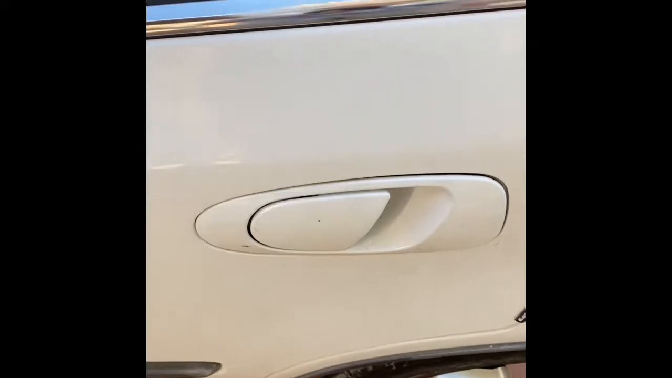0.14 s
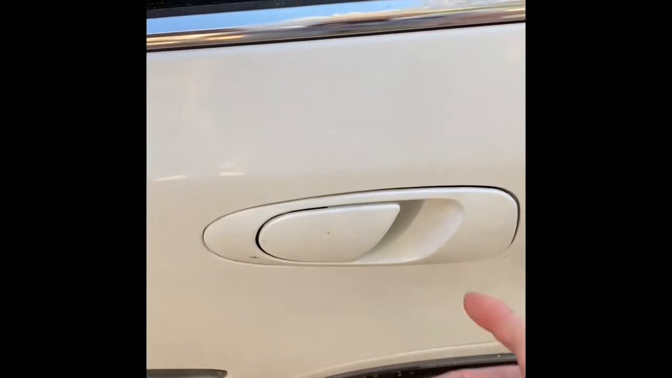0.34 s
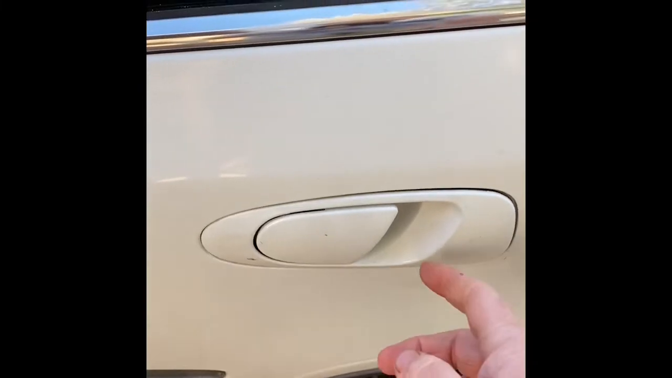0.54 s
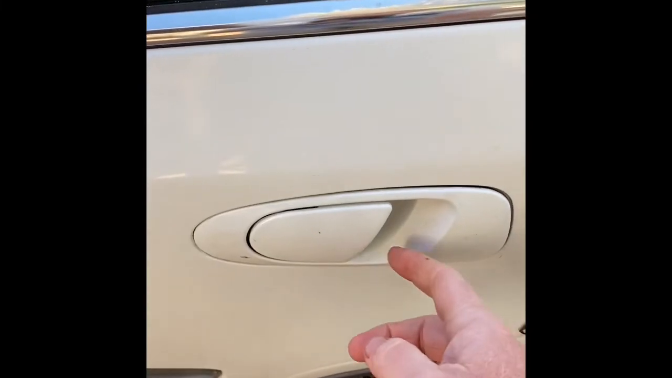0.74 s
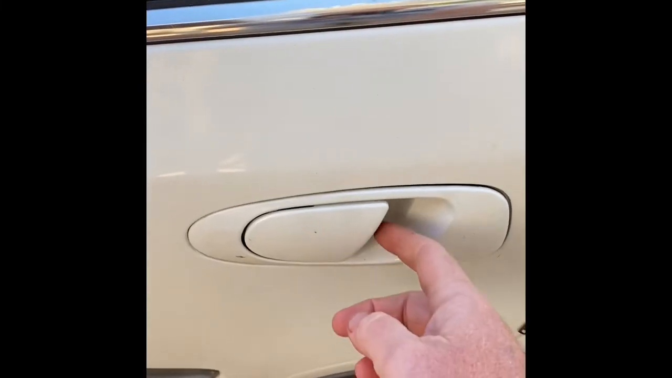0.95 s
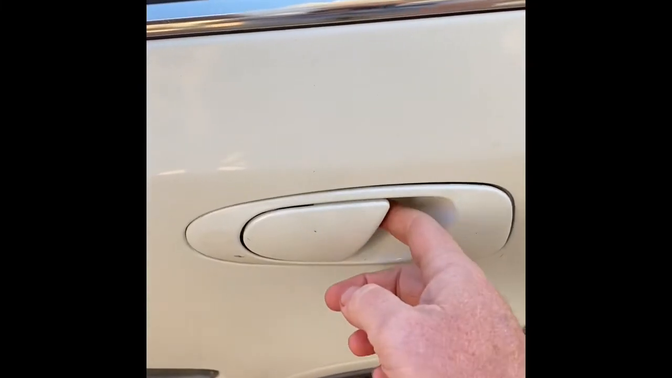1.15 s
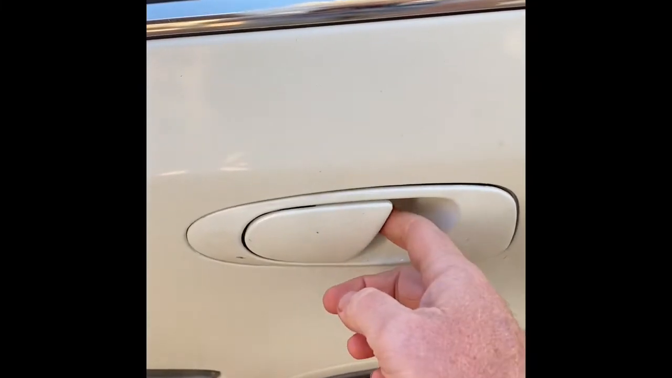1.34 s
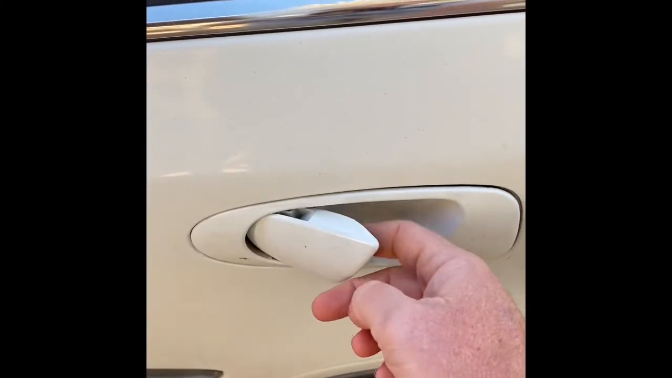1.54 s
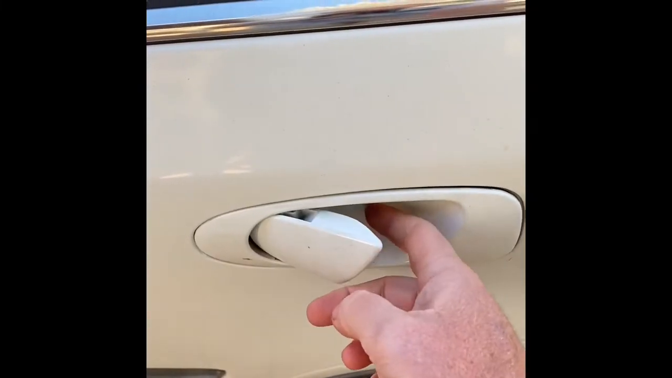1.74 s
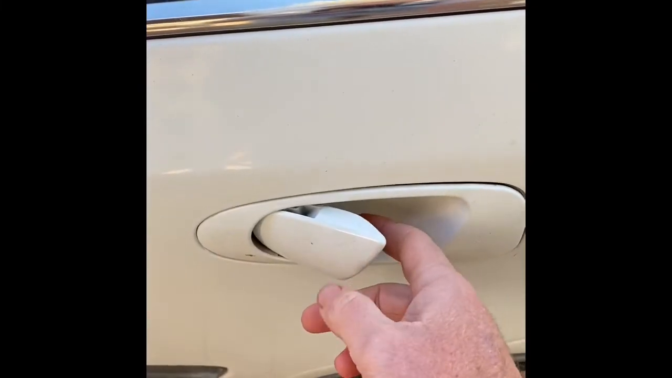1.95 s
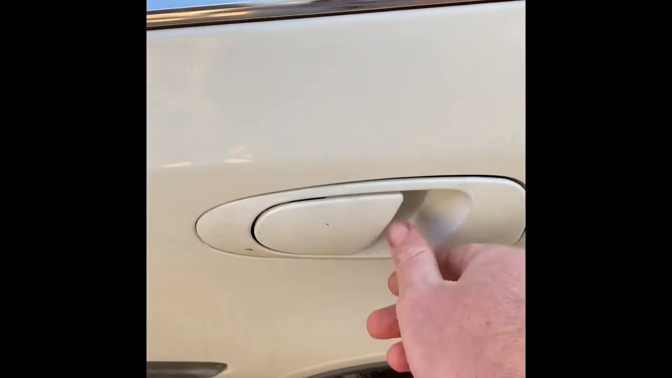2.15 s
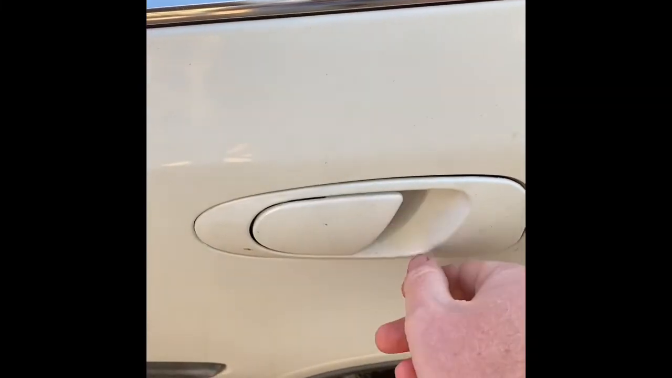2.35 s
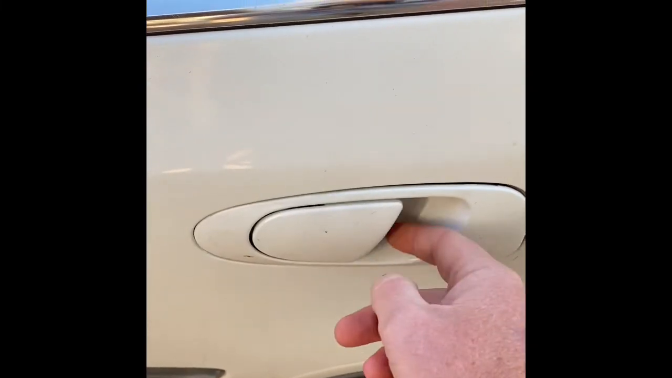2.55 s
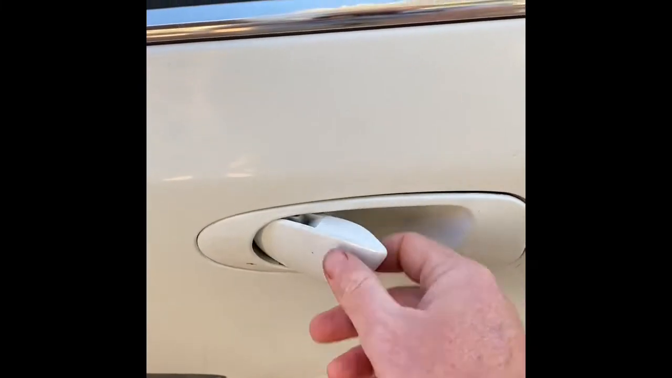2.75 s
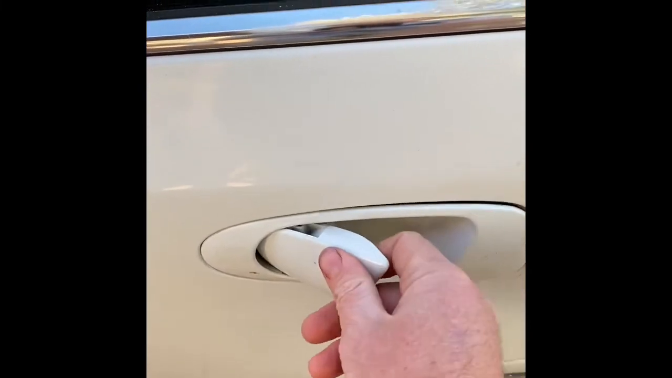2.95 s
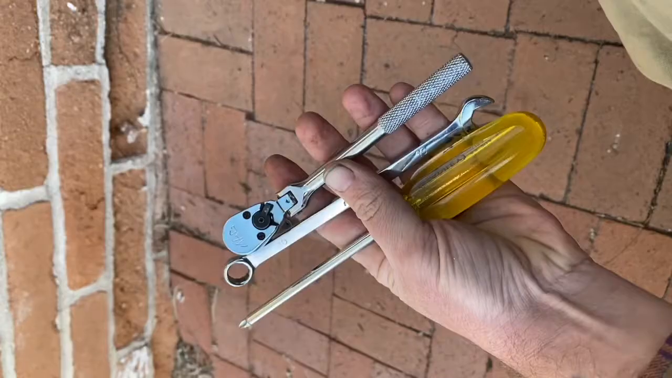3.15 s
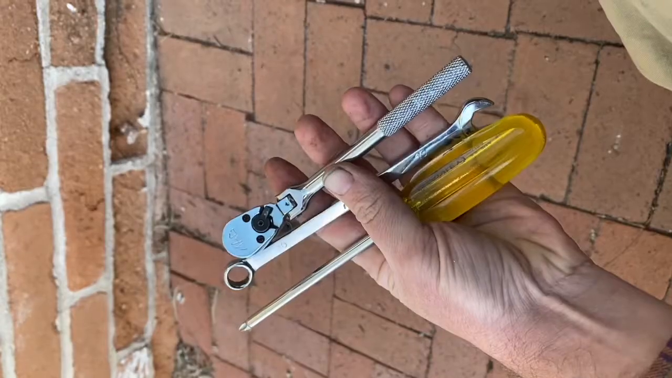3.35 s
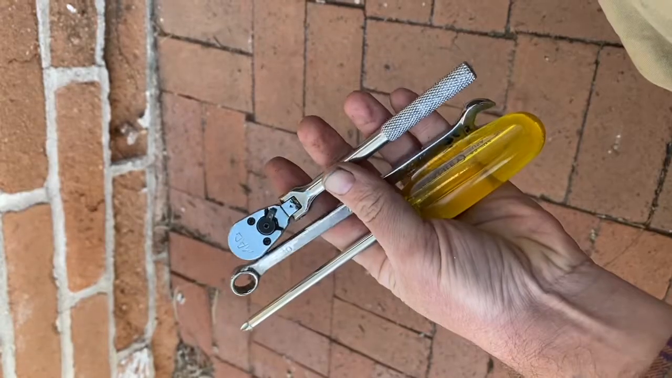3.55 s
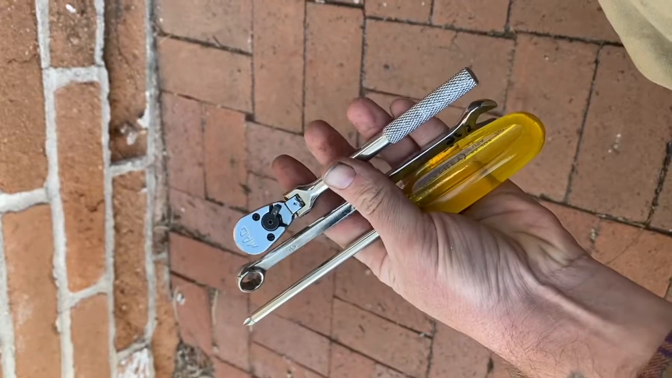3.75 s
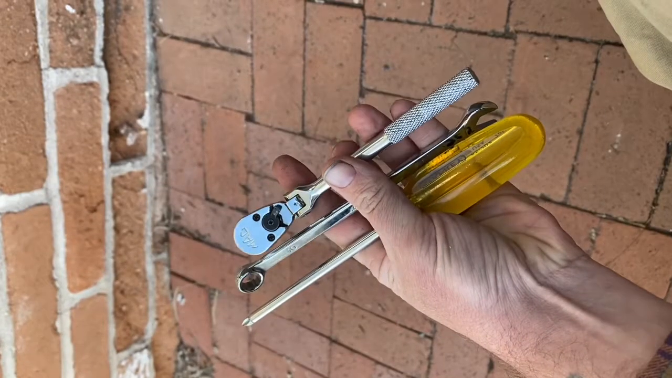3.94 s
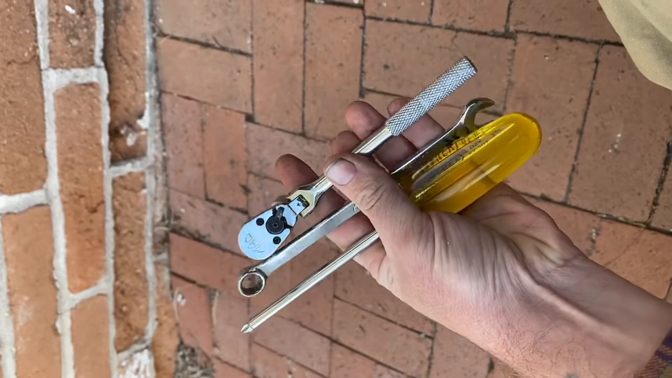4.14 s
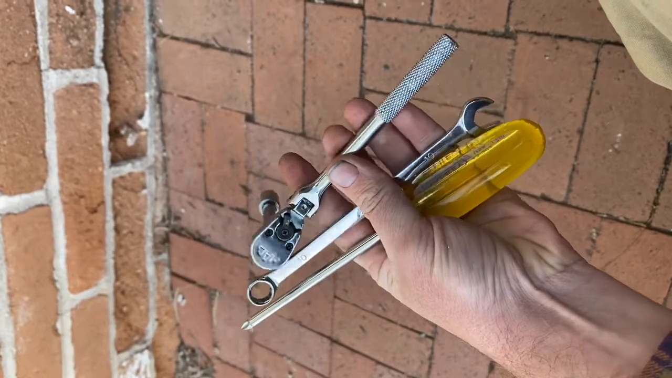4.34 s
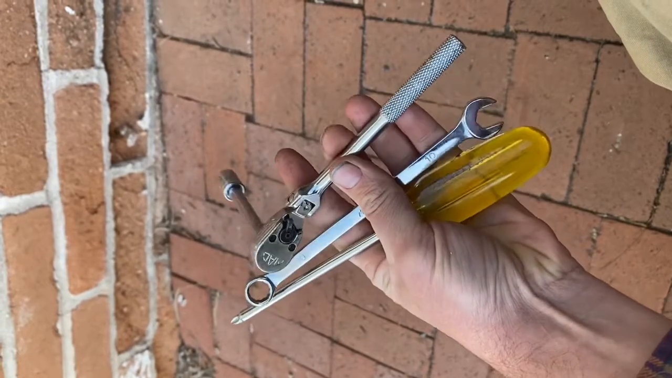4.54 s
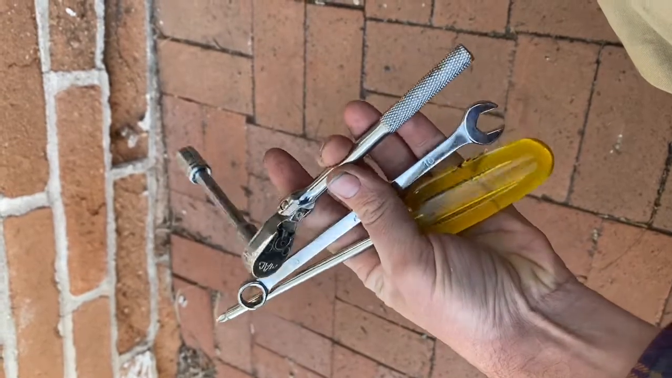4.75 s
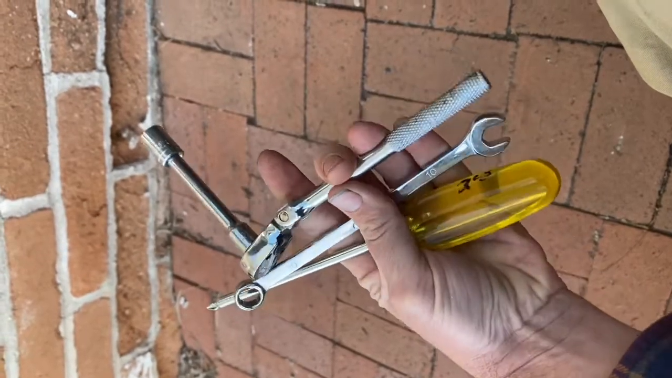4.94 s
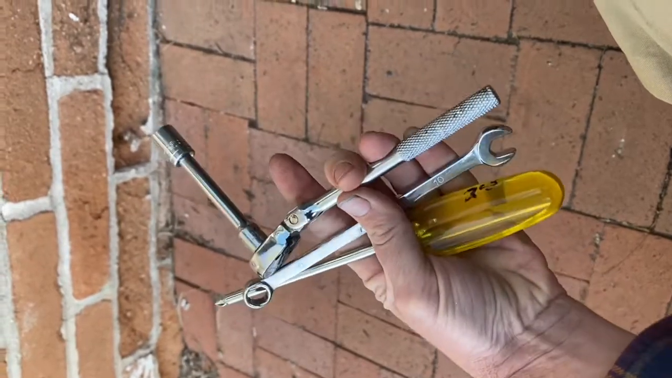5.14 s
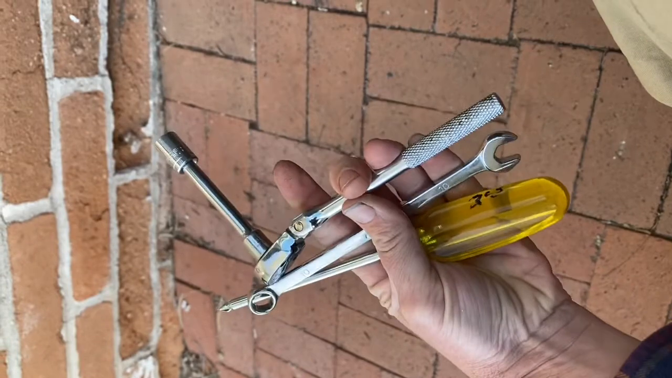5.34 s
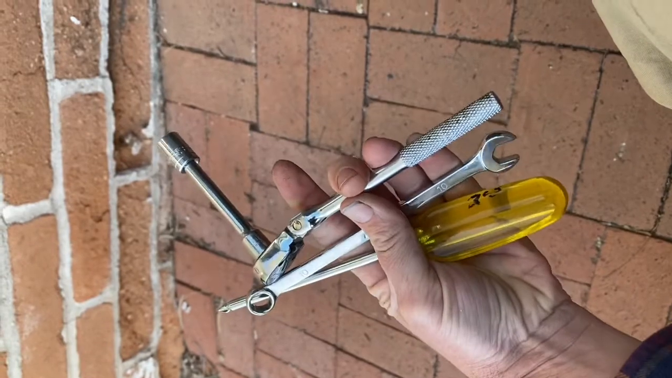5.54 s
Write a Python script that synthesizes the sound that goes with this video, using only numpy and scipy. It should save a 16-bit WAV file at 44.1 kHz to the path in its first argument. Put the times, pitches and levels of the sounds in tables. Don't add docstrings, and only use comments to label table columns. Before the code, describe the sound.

A plastic car door handle is pulled and dropped with loud hollow clacks amid fluttering wind rumble, then hand tools tick faintly in a quiet yard.

```python
import sys
import numpy as np
from scipy import signal
from scipy.fft import rfft, irfft, next_fast_len
from scipy.io import wavfile
from scipy.ndimage import uniform_filter1d

SR = 44100
rng = np.random.default_rng(int(sys.argv[2]) if len(sys.argv) > 2 else 0)


def elevation(decibels):
    levels = np.asarray(decibels, float)
    return 10 ** (levels / 20)


def int16_out(signal):
    q = np.round(np.clip(np.atleast_2d(signal).T, -1, 1) * 32767)
    wavfile.write(sys.argv[1], SR, q.astype(np.int16))


N = 250929

CHANGE_S, FADE_OUT_S, FADE_IN_S = 3.1, 0.017, 0.035
PORT_EDGE_HZ = 16100

# [f/Hz, phase/rad]
DOOR_LEAD = [(0, 0), (1000, -.3), (2300, .8), (4000, .3), (5500, .9), (7300, 3.1), (13300, 9.4),
             (16500, 13)]
YARD_LEAD = [(0, 0), (2000, 0), (3000, .8), (7000, 0), (10400, -6.2), (11500, -6.4), (15000, -12.5),
             (16500, -13)]
# [f/Hz, likeness/1]
FAR_LIKENESS = [(60, .85), (300, .8), (800, .25), (2500, .5), (5500, .45), (6800, .99), (16000, .99)]
NEAR_LIKENESS = [(60, .97), (900, .87), (2500, .92), (6500, .99), (16000, .97)]
# [f/Hz, level/dB]
NEAR_BALANCE = [(300, -.5), (650, -5.5), (1300, -3.5), (2300, 0)]

# [f/Hz, level per Hz/dB]
DOOR_AIR = [(30, 0.5), (800, -4.5), (2500, -25), (6500, -38.5), (9000, -41.5), (13000, -45), (15500, -50.5),
            (15900, -75)]
YARD_AIR = [(100, 1.5), (300, -16), (800, -9), (2000, -28.5), (4000, -35.5), (13000, -38.5), (15500, -35),
            (15900, -75)]
AIR_OFFSET_DB = 7.5
# (level/dB, top relative to it/dB)
DOOR_CALM_DB, YARD_CALM_DB = (-66.5, -20.5), (-66, -4.5)
# [middle t/s, half length/s, level/dB, top
# relative level/dB]
DOOR_SWELLS = [
    (0, 0.22, -65, 10),
    (0.557, 0.97, -69, 1),
    (1.3, 0.43, -68.5, -6),
    (2.003, 0.19, -71, -13.5),
    (2.168, 0.07, -64.5, -19),
    (2.458, 0.51, -63.5, -4),
    (2.799, 0.28, -60, 0.5),
]
YARD_SWELLS = [
    (3.45, 0.55, -78, 0),
    (4.149, 0.11, -70, 2),
    (4.7, 0.99, -69, -10),
    (5.6, 0.25, -65.5, 0.5),
]
SWELL_EDGE_DB, SWELL_POWER = -10, 2.5

# [t/s, length/s, f/Hz, level/dB]
HUMS = [
    (.4, .12, 365, -63),
    (.65, .28, 355, -62),
    (3.12, .9, 188, -65),
    (4.38, .2, 2100, -80),
]
# [t/s, length/s, f/Hz, level/dB]
RUSTLES = [
    (0, 0.37, 2170, -66.5),
    (0, 0.29, 4570, -71),
    (.637, 0.39, 2546, -65.5),
    (.642, 0.24, 3470, -70.5),
    (.642, 0.26, 4520, -71.5),
    (4.79, 0.21, 3880, -72.5),
    (4.78, 0.19, 2613, -71),
    (4.8, 0.24, 1810, -70.5),
    (5.6, .5, 1687, -68),
    (5.62, 0.35, 2480, -72),
]
HUM_WIDTH_SHARE, RUSTLE_WIDTH_SHARE, RUSTLE_FADE_DB = .04, .15, -18
# [middle t/s, half length/s, level/dB]
ENGINE_ORDERS = [
    [(4.45, 0.26, -65), (5.15, 0.207, -68)],
    [(4.946, 0.39, -69)],
    [(4.922, 0.19, -70)],
]
ENGINE_S, ENGINE_HZ, ENGINE_HZ_PER_S = 4.2, 163.3, 15

# [t/s, buzz level/dB, whistle level/dB, whistle delay/s, whistle t60/s]
CHIRPS = [
    (0.329, -70, -67.5, 0.096, 1),
    (1.05, -70, -72, 0.099, 1),
]
BUZZ_HZ, BUZZ_WIDTH_HZ, WHISTLE_HZ, OVERTONE_DB = 9200, 1500, 5750, -9
FIRST_PULSE, SECOND_PULSE = (0.051, 0.046, -8), (0.21, 0.027, 0.0)  # (delay/s, half length/s, level/dB)
TAIL_DB, TAIL_DB_PER_S, CHIRP_S, WHISTLE_SAG_PER_S = -5.5, -24, 0.595, .08

# [f/Hz, level per Hz/dB]
RUMBLE = [(15, -42.5), (30, -20), (50, 22), (75, 21.5), (110, 16), (150, -4.5), (220, -50)]
BUFFET = [(80, -16.5), (130, 3), (170, 1.5), (250, -4), (400, -15.5), (600, -21), (900, -46.5), (1500, -82)]
# [t/s, level/dB]
BREEZE = [(0, -55.5), (.18, -61), (.7, -52), (1.1, -45), (1.85, -45), (2.2, -40.5), (3.08, -41.5),
          (3.14, -69), (4.2, -53), (5.2, -55), (5.35, -64), (5.69, -60.5)]
BUFFET_DB, BUFFET_GROWTH, YARD_BUFFET_DB = -40, 1.6, -55
# [middle t/s, half length/s, rumble level/dB,
# buffet level/dB]
GUSTS = [(.03, 0.046, -43.5, -61), (.76, 0.03, -40, -43), (1.15, 0.036, -36, -40.5),
         (1.27, 0.022, -37.5, -36), (1.365, 0.033, -50, -28.5), (1.48, 0.056, -33, -41),
         (1.6, 0.056, -39, -38), (1.76, 0.069, -38.5, -30.5), (1.9, 0.057, -36, -29.5),
         (2.04, 0.065, -32, -29), (2.13, 0.092, -37.5, -38), (2.38, 0.063, -29.5, -31.5),
         (2.48, 0.036, -33, -32), (2.61, 0.046, -42, -27), (2.79, 0.046, -33.5, -47),
         (2.93, 0.092, -32.5, -37), (3.04, 0.034, -30.5, -26), (3.58, 0.087, -43, -57),
         (3.88, 0.071, -49, -60), (4.28, 0.061, -47, -60.5), (4.72, 0.021, -41, -52.5),
         (5.05, 0.04, -42.5, -54)]
# [t/s, peak level/dB, first f/Hz]
EDDIES = [(0.588, -41, 780), (1.085, -26, 846), (1.136, -33, 800), (1.161, -46, 700), (1.21, -44, 700),
          (1.267, -28, 1117), (1.444, -23, 900), (1.508, -51, 800), (1.567, -28.5, 1080), (1.583, -28, 860),
          (1.61, -30, 1054), (1.656, -33, 900), (1.69, -25, 1030), (1.702, -29.5, 800),
          (1.723, -25.5, 1144), (1.755, -23.5, 1150), (1.785, -29, 797), (1.795, -29.5, 924),
          (1.851, -37.5, 850), (1.865, -20.5, 893), (1.897, -25.5, 1226), (1.919, -27.5, 865),
          (1.931, -23.5, 804), (1.977, -25.5, 1077), (2.229, -38, 730), (2.253, -31.5, 802),
          (2.27, -39, 750), (2.289, -31.5, 970), (2.306, -35.5, 1150), (2.325, -21.5, 1000),
          (2.344, -39, 810), (2.378, -29.5, 922), (2.41, -29, 890), (2.447, -25.5, 1013),
          (2.459, -24.5, 1150), (2.482, -22, 1179), (2.504, -36.5, 807), (2.698, -33, 830),
          (2.72, -24, 873), (2.75, -27.5, 830), (2.793, -35, 775), (2.878, -26.5, 845), (2.89, -24, 880),
          (2.935, -38, 750), (3.009, -29, 887), (3.029, -24.5, 916)]

# [f/Hz, level/dB, t60/s]
BAR_MODES = [(2530, -16.5, 0.047), (3300, -13, 0.086), (3824, 1, 0.037), (3880, -18, 0.018),
             (5040, -20.5, 0.025), (6470, -7.5, 0.049), (6960, -0.5, 0.038), (9330, -10, 0.076),
             (11150, -4.5, 0.069), (13820, -19, 0.05)]
SPANNER_MODES = [(2690, -11.5, 0.039), (3180, -9.5, 0.056), (3750, -15, 0.075), (4730, -17, 0.046),
                 (6890, 4.5, 0.049), (10310, -11, .025), (11050, -4, 0.056)]
GRIP_MODES = [(4650, 6.5, 0.0087), (5400, 5, 0.0079), (6430, 9.5, 0.0071), (11060, -17.5, 0.0044),
              (14000, -17, 0.0021)]
# [f/Hz, level per Hz/dB]
SCUFF = [(1500, -24.5), (2500, -2), (4000, 1), (8000, -8), (16000, -1)]
# [t/s, peak level/dB, pitch factor for size of part/1]
BAR_TICKS = [
    (3.5025, -58, 1.01),
    (3.9822, -27.5, 1.027),
    (4.8076, -64, 1.01),
]
SPANNER_TICKS = [
    (3.4462, -64, 1.14),
    (4.3117, -32.5, 1.046),
    (5.5768, -55, 0.99),
]
GRIP_TICKS = [
    (3.3294, -54.5, 0.48),
    (3.942, -36.5, 0.92),
    (3.9442, -31, 1),
    (3.962, -38, 0.93),
    (4.3686, -47, 0.43),
    (4.4419, -51.5, 0.52),
    (4.7417, -42, 0.98),
    (4.7445, -43.5, 0.91),
    (5.5424, -51, 1.47),
    (5.5775, -48, 1.25),
]

# [f/Hz, level/dB, t60/s]
PULL_MODES = [(356, -11, .2), (544.4, -9.5, 0.23), (623, -0.5, 0.22), (780, -0.5, 0.18), (868, 4.5, 0.073),
              (998, -7.5, 0.23), (1076, -4.5, 0.19), (1239, -7.5, 0.091), (1701, -11, .11),
              (1872, -5.5, 0.076), (1980, -13.5, 0.1), (2253, -10, .064), (2625, -15.5, 0.065),
              (3230, -16.5, 0.13)]
DROP_MODES = [(381, 2.5, 0.12), (548, -4.5, .15), (621, 3.5, 0.25), (842.6, -8, .11), (1010, -9, 0.11),
              (1125, -9.5, .11), (1239, -19, 0.084), (1635, -13, 0.097), (2130, -18, .1),
              (2290, -14.5, 0.099), (2540, -22.5, .07), (3252, -25, .11), (3585, -25, .09)]
LATCH_MODES = [(524, -9.5, 0.096), (607, -1, .15), (700, -3, 0.2), (840, 2, 0.065), (992, -7.5, 0.26),
               (1122, -13, 0.2), (1500, -6, .06), (1586, -1, .1), (1822, -14.5, 0.13), (2030, -17.5, .12),
               (2202, -4.5, 0.055), (2607, -21.5, 0.11), (3147, -21, .088)]
SEAT_MODES = [(358, -5.5, 0.12), (529, -10, 0.092), (609, 4, 0.059), (883, -1, 0.066), (1003, -1, 0.12),
              (1450, -4, 0.068), (1633, -6.5, 0.11), (1913, -8.5, .1), (2405, -26, 0.13), (3210, -26, 0.12)]
SPRING_MODES = [(900, -11, 0.1), (1753, -3, 0.11), (2220, -6.5, .04), (5250, -14, 0.053), (5560, -23, .07),
                (11400, -19.5, 0.026)]
# [f/Hz, level/dB, t60/s]
CRACK_MODES = [(893, 1, 0.016), (1150, -6.5, 0.016), (2000, -3, 0.032), (2620, -5, 0.014),
               (3050, -5.5, 0.015), (5270, -9.5, 0.013), (6440, 2.5, 0.0078), (10340, -13, 0.00495),
               (14000, -21.5, .008)]
SLAP_MODES = [(1031, 2, 0.016), (1910, 6, 0.009), (2650, -4, 0.013), (3300, 0.5, 0.0086),
              (4490, -11, 0.018), (5640, -8, 0.01), (9500, -13, 0.01), (10950, -13, 0.014)]
# [f/Hz, factor on t60/1]
RATTLE = [(200, -20.5), (500, 0.5), (900, -8.5), (2000, -11.5), (3500, -24), (6000, -22.5), (11000, -29),
          (16000, -47.5)]
RATTLE_LIFE = [(200, 2.7), (800, 1.2), (2000, 0.83), (6000, 0.6), (15000, 0.09)]
# [t/s, ring level/dB, crack level/dB, rattle level/dB, rattle t60/s]
PULLS = [
    (1.319, -39, -52.5, -52, 0.67),
    (1.333, -43, -59.5, -42, 0.43),
    (1.3407, -36.5, -12, -27.5, 0.11),
    (1.342, -4.5, -3, -24, 0.16),
    (1.353, -20, -34, -33, .12),
    (1.47, -60, -44.5, -66, 0.033),
]
DROPS = [
    (2.0165, -38.5, -32.5, -30, 0.21),
    (2.0195, -24.5, 0.5, -21, 0.091),
    (2.022, -8.5, -15, -26.5, 0.12),
    (2.0258, -20.5, -3.5, -28, 0.089),
    (2.039, -8, -43, -42, 0.3),
]
LATCHES = [
    (2.5605, -27.5, -37.5, -40.5, 0.52),
    (2.572, -33, -50.5, -39, 0.13),
    (2.5797, -34.5, -11, -26, 0.12),
    (2.5812, -6.5, -1, -21, 0.13),
    (2.591, -23, -34, -29.5, 0.096),
    (2.608, -22, -46, -41, 0.091),
    (2.626, -29.5, -36, -42, 0.22),
]
SEATS = [
    (2.815, -15, -35, -35, 0.1),
    (2.828, -38, -45, -38, 0.16),
    (2.96, -61.5, -46, -53, 0.34),
    (3.022, -31, -44, -42, 0.13),
]
SPRINGS = [
    (1.99, -53, -49, -47, 0.59),
    (2.0, -32, -44, -46, 0.079),
    (2.009, -37.5, -49, -45.5, 0.18),
    (2.095, -26, -26, -32.5, 0.1),
    (2.12, -32, -46, -46, 0.22),
    (2.42, -60, -49.5, -56, 0.054),
]
PULL_TILT_DB, DROP_TILT_DB, LATCH_TILT_DB, SEAT_TILT_DB, SPRING_TILT_DB = -0.2, 1.5, -1, -4.15, 1.5


def evened(x):
    return x / np.sqrt(np.mean(x ** 2) + 1e-20)


def steadied(x, span_s):
    power = abs(uniform_filter1d(x ** 2, int(span_s * SR)))
    return x / np.sqrt(power + 0.045)


def read(points, hz):
    f, value = np.transpose(points)
    return np.interp(np.log(hz + 1), np.log(f + 1), value)


def curve(rows):
    s, *columns = np.transpose(rows)
    return [np.interp(np.arange(N) / SR, s, c) for c in columns]


def swells(rows, calm_db):
    s, half, *columns = np.transpose(rows)[:, :, None]
    t = np.arange(0, N + 64, 64) / SR
    shape_db = np.maximum(SWELL_EDGE_DB * (abs(t - s) / half) ** SWELL_POWER, -200)
    curves_db = []
    for middle_db, calm in zip(columns, calm_db):
        power = elevation(2 * (middle_db + shape_db)).sum(0)
        power = np.interp(np.arange(N) / SR, t, power)
        curves_db.append(10 * np.log10(power + elevation(2 * np.asarray(calm))))
    return curves_db


def add(mix, s, sound):
    part = mix[..., int(round(s * SR)):][..., :sound.shape[-1]]
    part += sound[..., :part.shape[-1]]


def coloured(spectrum, size=N):
    hz = np.fft.rfftfreq(size, 1 / SR)
    white = rfft(rng.standard_normal((2, size)))
    return evened(irfft(white * elevation(read(spectrum, hz)), size))


def lumps(per_s):
    hz = np.fft.rfftfreq(N, 1 / SR)
    return evened(irfft(rfft(rng.standard_normal(N)) / (1 + (hz / per_s) ** 4), N))


def whistle(hz, width):
    r = np.exp(-np.pi * max(width, 1) / SR)
    z = rng.standard_normal((2, len(hz))) + 1j * rng.standard_normal((2, len(hz)))
    drive = 3 * np.sqrt((1 - r) * (width < 30))
    z = signal.lfilter([1], [1, -2 * r, r * r], z + drive)
    carrier = np.exp(2j * np.pi * np.cumsum(hz) / SR)
    return evened((z * carrier).real)


def ring(modes, pitch=1, longest=0.9):
    t = np.arange(SR // 4) / SR
    hz, db, t60 = np.transpose(modes)[:, :, None]
    spread = np.array([.15, 1])[:, None, None]
    phase = 2 * np.pi * rng.random((2, len(modes), 1)) * spread
    decay = elevation(db - 60 * t / np.clip(t60, .002, longest))
    out = (decay * np.sin(2 * np.pi * hz * pitch * t + phase)).sum(1)
    return out / abs(out).max() * np.minimum(t / 0.00031, 1)


def ports(pair, lead, same, balance=((1, 0), (2, 0))):
    size = next_fast_len(N + 4096)
    hz = np.fft.rfftfreq(size, 1 / SR)
    c = np.clip(read(same, hz), 0, 1)
    turn = np.exp(.5j * np.interp(hz, *np.transpose(lead)))
    tip = elevation(read(balance, hz) / 2)
    main, spare = rfft(np.pad(pair, ((0, 0), (2048, size - N - 2048)), "reflect"))
    left = main * turn * tip
    right = (c * main + np.sqrt(1 - c ** 2) * spare) / turn / tip
    return irfft([left, right], size)[:, 2048:][:, :N]


def air(spectrum, rows, calm_db):
    level_db, top_db = swells(rows, calm_db)
    low = coloured(spectrum)
    top = signal.sosfilt(signal.butter(2, 3000, "high", fs=SR, output="sos"), low)
    return elevation(level_db + AIR_OFFSET_DB + 0.91 * lumps(14)) * (low + (elevation(top_db) - 1) * top)


def neighbourhood():
    out = np.zeros((2, N))
    for rows, dying in (HUMS, 0), (RUSTLES, 1):
        for s, length, hz, db in rows:
            size = int(length * SR)
            width = hz * (RUSTLE_WIDTH_SHARE if dying else HUM_WIDTH_SHARE)
            fade = elevation(np.linspace(0, RUSTLE_FADE_DB * dying, size))
            shape = fade * signal.windows.tukey(size, .15 - 0.15 * dying)
            add(out, max(s, 0), elevation(db) * shape * whistle(np.full(size, hz), width))
    return out


def engine():
    hz = ENGINE_HZ + ENGINE_HZ_PER_S * (np.arange(N) / SR - ENGINE_S)
    out = np.zeros((2, N))
    for order, rows in enumerate(ENGINE_ORDERS, 2):
        level_db, = swells(rows, [-130])
        out += elevation(level_db) * whistle(order * hz, 10)
    return out


def insect():
    t = np.arange(N) / SR
    buzz, thin, sag = np.zeros((3, N))
    for s, buzz_db, thin_db, delay, t60 in CHIRPS:
        pulses = [(s + d, half, db) for d, half, db in (FIRST_PULSE, SECOND_PULSE)]
        pulses_db, = swells(pulses, [-60])
        on = np.clip(np.minimum(t - s, s + CHIRP_S - t) / 0.082, 0, 1)
        tail = on * elevation(TAIL_DB + TAIL_DB_PER_S * abs(t - s - SECOND_PULSE[0]))
        buzz += elevation(buzz_db) * (elevation(pulses_db) + tail)
        u = np.maximum(t - s - delay, 0)
        ends = np.minimum(u / 0.033, 1) * np.clip((.18 - u) / .09, 0, 1)
        thin += elevation(thin_db - 60 * u / t60) * ends
        sag += WHISTLE_SAG_PER_S * u * (u < .2)
    buzz = buzz * elevation(2.0 * lumps(60)) * whistle(np.full(N, BUZZ_HZ), BUZZ_WIDTH_HZ)
    hz = WHISTLE_HZ * (1.005 - sag + 0.0022 * lumps(17))
    return buzz + thin * (whistle(hz, 130) + elevation(OVERTONE_DB) * whistle(2 * hz, 250))


def eddy(first_hz, slow, start):
    length = 0.0046 + .002 * slow
    u = np.arange(int(5 * length * SR)) / SR / length
    tumble = 1 + .09 * evened(uniform_filter1d(rng.standard_normal(len(u)), size=200))
    turns = np.cumsum(first_hz * (.15 + 0.67 * np.exp(-u / .7)) * tumble) / SR
    burst = np.tanh(u / 0.36) * u * np.exp(-u / 0.68)
    quarter = np.array([[0], [.25]])
    return burst * np.sin(2 * np.pi * (turns + start + quarter))


def wind():
    breeze_db, = curve(BREEZE)
    by_door = np.arange(N) < CHANGE_S * SR
    calm_db = np.where(by_door, BUFFET_DB + BUFFET_GROWTH * (breeze_db + 42.0), YARD_BUFFET_DB)
    rumble_db, buffet_db = swells(GUSTS, (breeze_db, calm_db))
    out = elevation(rumble_db + 3.8 * lumps(26.0) + 0.38) * steadied(coloured(RUMBLE), 0.037)
    out += elevation(buffet_db + 3.664 * lumps(41.4) - 2.5) * steadied(coloured(BUFFET), 0.025)
    for s, db, first_hz in EDDIES:
        slow, start = rng.random(2)
        add(out, s - .0012, elevation(db + 8.5) * eddy(first_hz, slow, start))
    return out


def tools():
    out, t = np.zeros((2, N)), np.arange(SR // 4) / SR
    kinds = [  # ticks, modes, scuff level/dB, scuff t60/s
        (BAR_TICKS, BAR_MODES, -17, .03),
        (SPANNER_TICKS, SPANNER_MODES, -17, .03),
        (GRIP_TICKS, GRIP_MODES, -23, .008)]
    for ticks, modes, scuff_db, t60 in kinds:
        for s, db, pitch in ticks:
            scuff = elevation(scuff_db - 60 * t / t60) * coloured(SCUFF, len(t))
            add(out, s, elevation(db) * (ring(modes, pitch, longest=0.073) + scuff))
    return out


def rattle(rods_hz, tilt_db, t60):
    t60 = max(t60, .02)
    hz, t, z = signal.stft(rng.standard_normal((2, SR // 4)), SR, nperseg=128, noverlap=96)
    colour_db = read(RATTLE, hz) + tilt_db * np.log2(hz / 1000 + 0.76)
    decay_db = -60 * t / (t60 * read(RATTLE_LIFE, hz))[:, None]
    z = z * elevation(colour_db[:, None] + decay_db)
    noise = signal.istft(z, SR, nperseg=128, noverlap=96)[1][:, :SR // 4]
    onset = np.minimum(np.arange(SR // 4) / (0.00022 * SR), 1)
    noise *= onset / np.sqrt(np.mean(elevation(2 * colour_db)))
    uneven_db = 8.4 * rng.standard_normal(len(rods_hz))
    rods_db = np.interp(rods_hz, hz, colour_db) + 1.1 * np.log2(rods_hz) + uneven_db
    rods = ring(np.transpose([rods_hz, rods_db, t60 * read(RATTLE_LIFE, rods_hz)]))
    return elevation(2.0) * noise + elevation(4.0) * rods


def door(blows, modes, tilt_db, edge=CRACK_MODES):
    out = np.zeros((2, N))
    rods_hz = np.geomspace(450, 7000, 40) * rng.uniform(.97, 1.03, 40)
    for s, ring_db, crack_db, rattle_db, t60 in blows:
        clack = elevation(ring_db) * ring(modes, longest=0.3) + elevation(crack_db) * ring(edge)
        add(out, s, clack + elevation(rattle_db) * rattle(rods_hz, tilt_db, t60))
    return out


def handle():
    out = door(PULLS, PULL_MODES, PULL_TILT_DB)
    out += door(DROPS, DROP_MODES, DROP_TILT_DB, SLAP_MODES)
    out += door(LATCHES, LATCH_MODES, LATCH_TILT_DB)
    out += door(SEATS, SEAT_MODES, SEAT_TILT_DB)
    out += door(SPRINGS, SPRING_MODES, SPRING_TILT_DB, SLAP_MODES)
    return out


def scene():
    t = np.arange(N) / SR
    distant = neighbourhood() + engine() + insect()
    gusts, steel, clacks = wind(), tools(), handle()
    by_door = ports(air(DOOR_AIR, DOOR_SWELLS, DOOR_CALM_DB) + distant, DOOR_LEAD, FAR_LIKENESS)
    by_door += ports(gusts + steel, DOOR_LEAD, NEAR_LIKENESS)
    by_door += ports(clacks, DOOR_LEAD, NEAR_LIKENESS, NEAR_BALANCE)
    in_yard = ports(air(YARD_AIR, YARD_SWELLS, YARD_CALM_DB) + distant + gusts, YARD_LEAD, FAR_LIKENESS)
    in_yard += ports(steel, YARD_LEAD, NEAR_LIKENESS) * elevation([[1.5], [-1.5]])
    by_door *= np.clip(t / .008, 0, 1)
    fade_out = np.clip((CHANGE_S - t) / FADE_OUT_S, 0, 1)
    fade_in = np.clip((t - CHANGE_S) / FADE_IN_S, 0, 1)
    return by_door * fade_out + in_yard * fade_in


def roll_off(x):
    return signal.sosfilt(signal.butter(12, 16790, fs=SR, output="sos"), x)


def record(dry):
    limited = signal.oaconvolve(dry, signal.firwin(101, PORT_EDGE_HZ, fs=SR)[None], "same")
    limited = signal.sosfilt(signal.butter(2, 30, "high", fs=SR, output="sos"), limited)
    return roll_off(limited)


dry = scene()
out = record(dry)
int16_out(out)
```